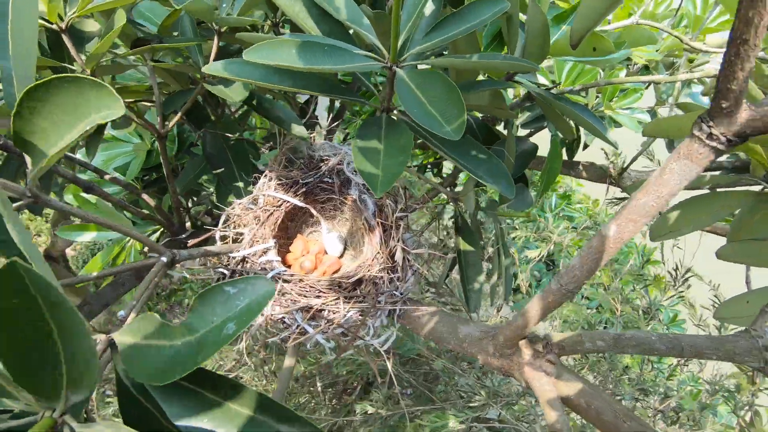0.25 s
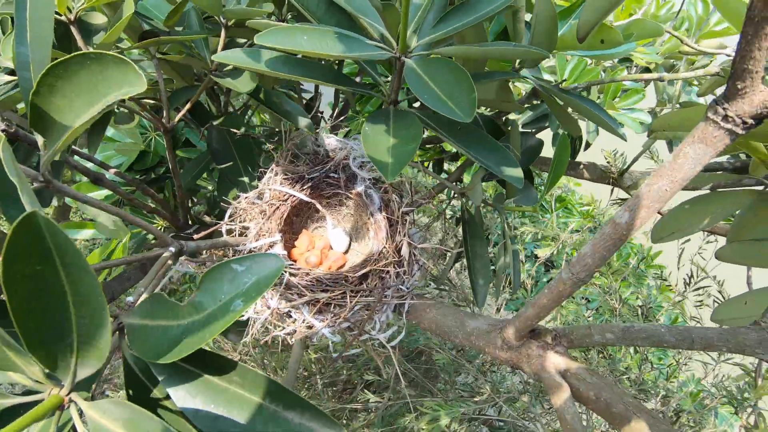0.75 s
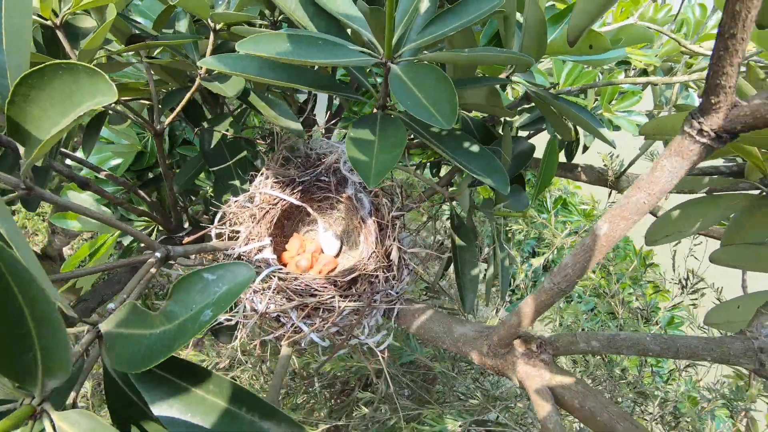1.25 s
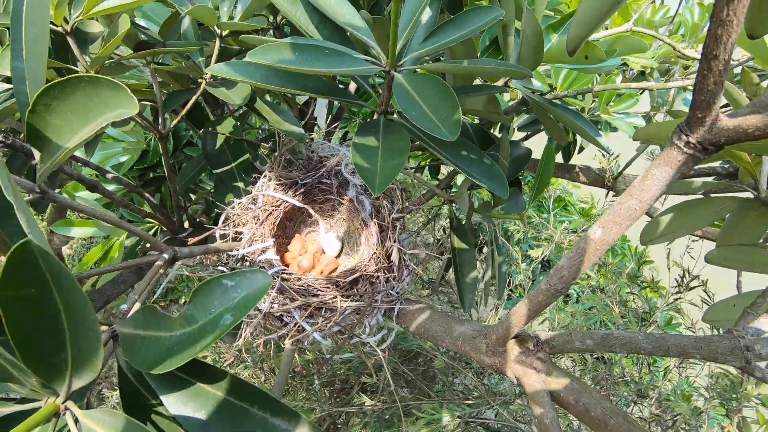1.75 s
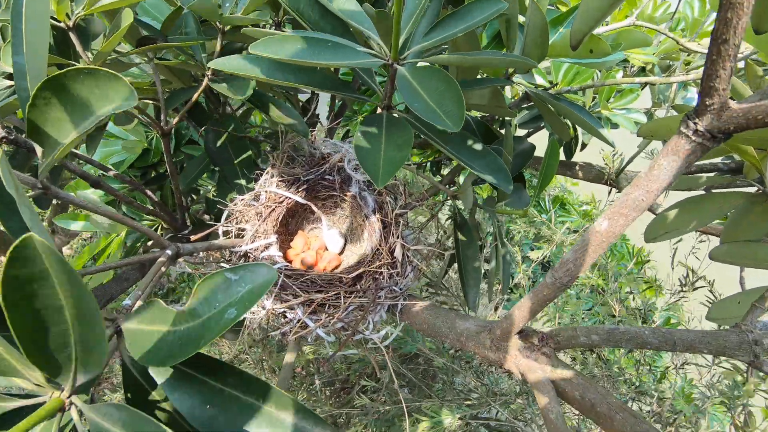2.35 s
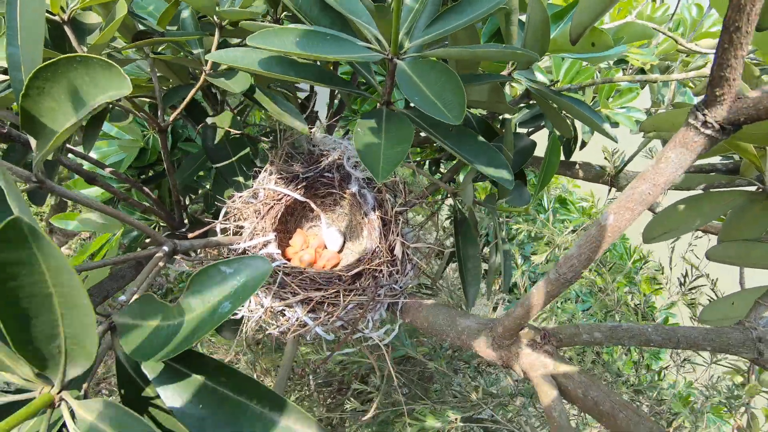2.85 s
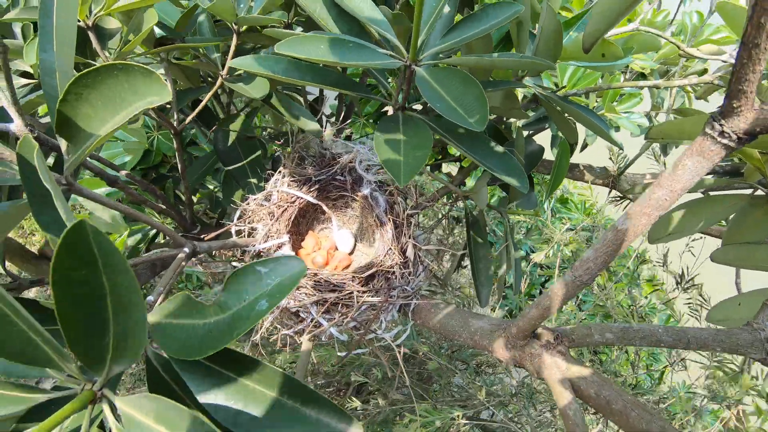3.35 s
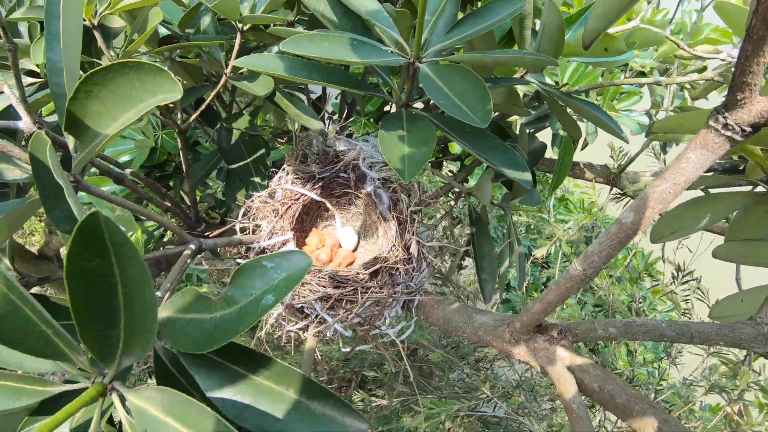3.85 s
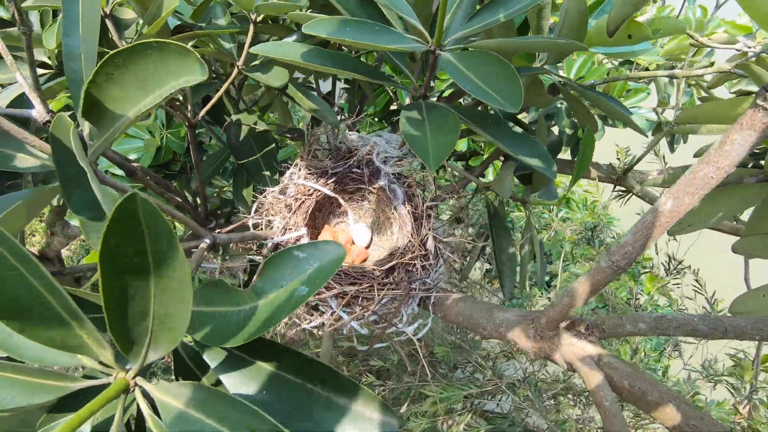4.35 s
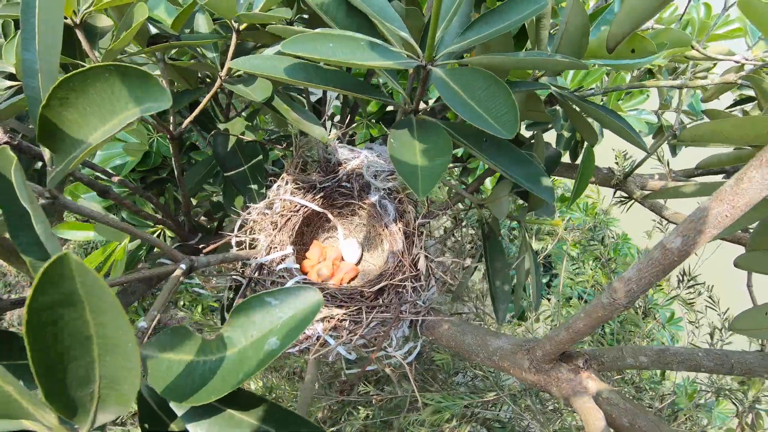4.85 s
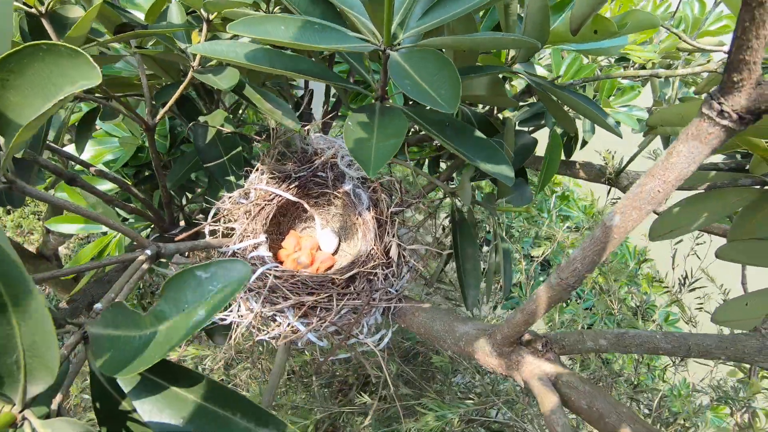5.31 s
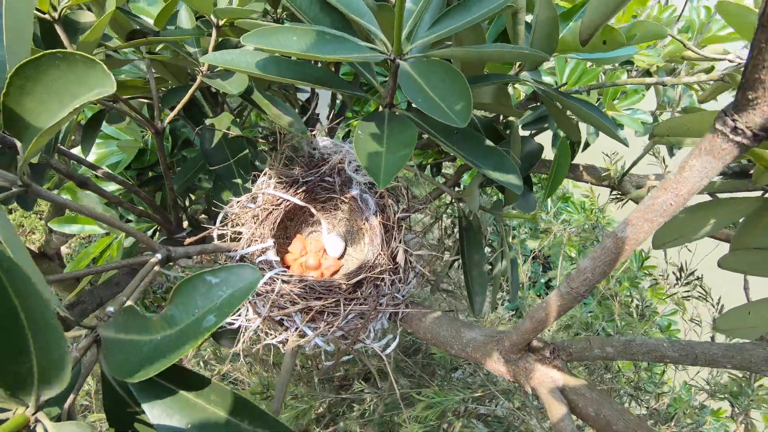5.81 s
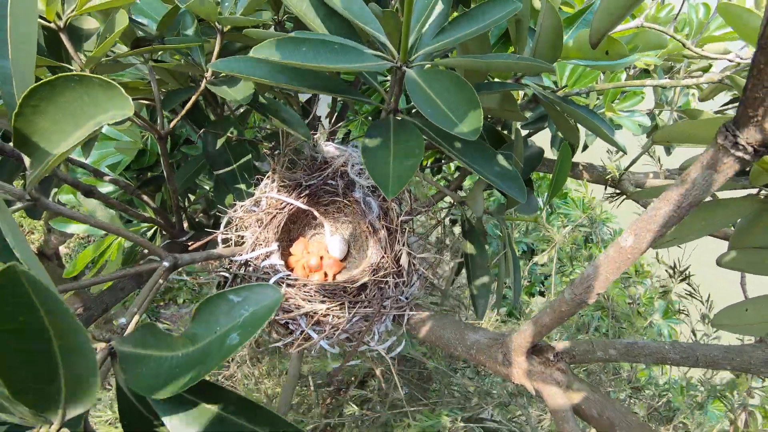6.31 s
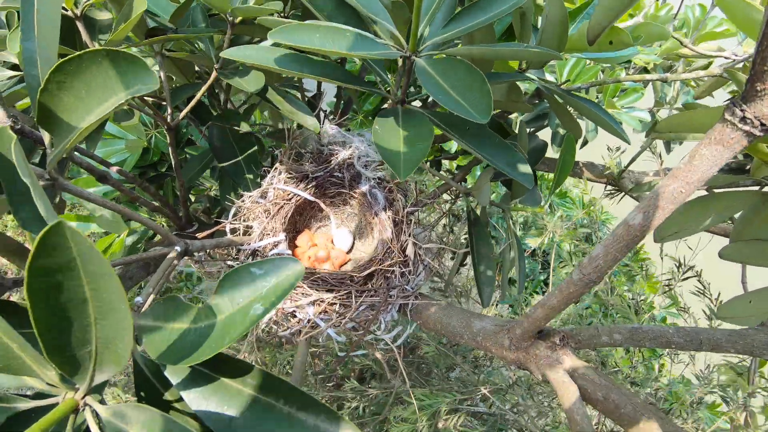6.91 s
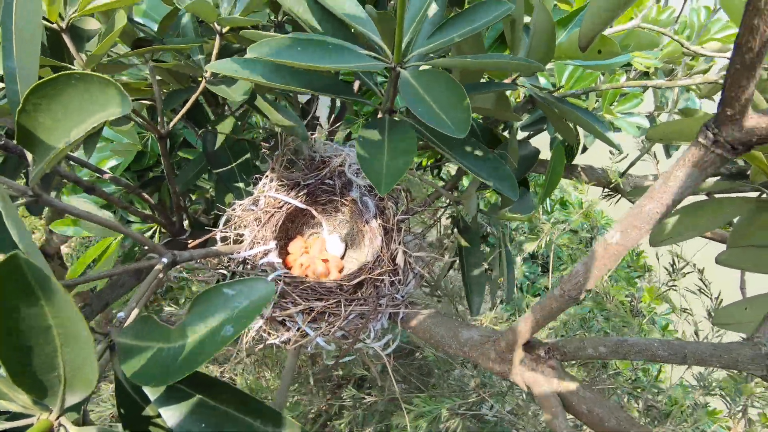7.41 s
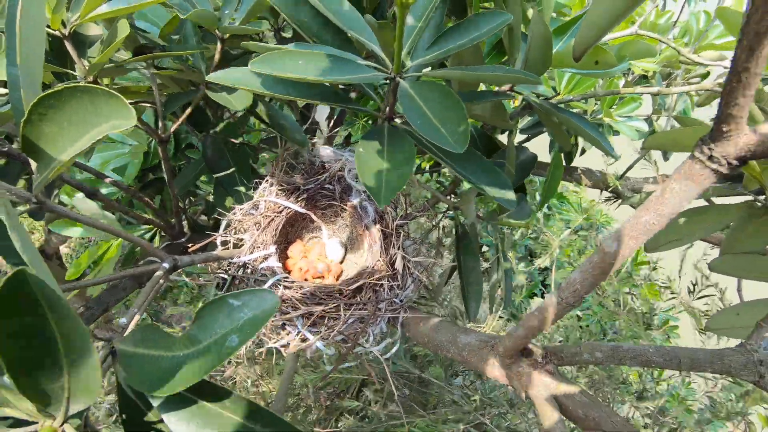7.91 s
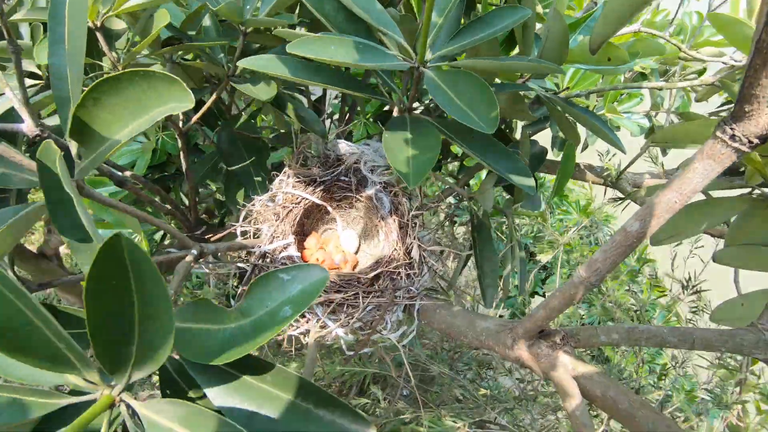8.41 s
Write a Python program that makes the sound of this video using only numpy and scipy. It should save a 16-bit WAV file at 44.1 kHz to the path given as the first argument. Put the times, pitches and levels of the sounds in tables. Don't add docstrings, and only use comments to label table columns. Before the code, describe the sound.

A hard double knock on a hollow pole, seconds of hollow scraping and rumbling jolts, a mid-way rattle of taps, then violent scrabbling strikes.

```python
import sys
import numpy as np
from scipy import signal
from scipy.fft import rfft, irfft
from scipy.io import wavfile

SR = 44100
rng = np.random.default_rng(int(sys.argv[2]) if len(sys.argv) > 2 else 0)


def rack_gain(trim_db):
    fader = np.asarray(trim_db, float)
    return 10 ** (fader / 20)


def inscribe(sig):
    pcm = np.round(np.clip(np.atleast_2d(sig).T, -1, 1) * 32767)
    wavfile.write(sys.argv[1], SR, pcm.astype(np.int16))


N = 382285
WHITE_DB = 10 * np.log10(2 / SR)

RUB_EDGES_HZ = [280, 950, 3500]
USUAL_RUB_DB = [-23, -40, -40, -55.5]
# (frequency [Hz], width [Hz], left [dB per Hz], right [dB per Hz], right lead [rad])
POLE_MODES = [(45, 30, -71, -63, .2), (67, 22, -59, -49, 1.0), (86, 28, -61, -50, .6),
              (133, 22, -59, -47, .5), (148, 16, -64, -47, 2.4), (165, 18, -56, -45, 3.1),
              (235, 60, -76, -68, 3.1), (340, 100, -77, -69, 3.0), (433, 25, -72, -60.5, -2.9),
              (490, 50, -75, -68.5, -2.9), (612, 44, -77, -67.5, -2.9), (695, 38, -69, -64, -2.7),
              (765, 60, -76, -74, -2.8)]
# (frequency [Hz], width [Hz], left [dB per Hz], right [dB per Hz], right lead [rad])
FRAME_MODES = [(960, 110, -78, -81, -2.2), (1076, 65, -66, -66, -2.65), (1210, 140, -75, -75, -2.8),
               (1400, 75, -73.5, -71.5, -2.6), (1620, 120, -84, -83, -1.0), (1770, 120, -88, -86, -.8),
               (2190, 135, -73, -73.5, -1.7), (2300, 120, -78, -79, -1.9), (2580, 150, -82, -77.5, -1.4),
               (2770, 120, -84, -84, -1.0), (2980, 200, -93, -93, -.6), (3290, 150, -86.5, -84, -.6),
               (3660, 150, -90, -90, -1.2)]
# (frequency [Hz], width [Hz], left [dB per Hz], right [dB per Hz], right lead [rad])
SHELL_MODES = [(4030, 200, -85.5, -84.5, -.4), (4720, 320, -94, -86, -.6), (5080, 120, -87, -88, 0.1),
               (5385, 180, -88, -87, -.7), (5980, 450, -98, -95, .4), (6900, 150, -104, -100, .5),
               (7780, 240, -90, -114, 2.5), (8700, 250, -98, -114, -3.0)]
BODY_MODES = POLE_MODES + FRAME_MODES + SHELL_MODES
# (time [s], peak [dB])
JOLTS = [(0.487, -20), (0.85, -42.5), (1.561, -13.5), (1.597, -10), (1.967, -34), (2.305, -18.5),
         (2.449, -49), (2.853, -4.5), (3.83, -18.5), (4.056, -8.5), (4.495, -10), (4.913, -14),
         (5.043, -7.5), (5.592, -13), (6.214, -12), (6.689, -29), (6.738, -30), (7.875, -6.5), (7.892, -24),
         (8.024, -2.5)]
# (time [s], length [s], level [dB], centre [Hz], pan [dB])
BRUSHES = [(.0, 0.005, -42, 4890, 2.5), (0.011, 0.0078, -39, 4000, 3), (1.458, 0.011, -61, 6030, -15),
           (2.036, 0.02, -63, 2400, -4), (4.985, 0.018, -44, 4000, 0), (4.98, .012, -50, 2800, 0),
           (7.931, 0.009, -50, 2500, 3), (7.933, .008, -54, 6500, 5), (7.87, .005, -54, 6500, 8),
           (7.879, .006, -40, 6500, 8), (7.997, 0.006, -37, 8500, 8), (7.995, .019, -40, 4000, 0),
           (8.001, 0.037, -55, 5870, 11), (7.982, .007, -48, 7000, 5), (8.009, .009, -44, 9000, 8),
           (8.045, .01, -56, 5500, 3), (8.095, .008, -60, 6000, 4), (.046, .005, -62, 7000, 5),
           (.004, .004, -42, 8500, 5), (1.45, .016, -62, 6050, -12)]
# (frequency [Hz], level [dB per Hz])
RUSTLE_SPECTRUM = [(30, -81.5), (200, -78), (500, -87), (900, -84), (1900, -101), (4500, -104),
                   (7000, -107), (10000, -110), (12000, -119), (13000, -145)]
# (frequency [Hz], level [dB per Hz])
AIR_SPECTRUM = [(30, -88), (120, -86), (400, -98), (1000, -108), (2000, -116), (3300, -123), (3700, -115),
                (5000, -114), (5400, -124), (9000, -135), (13000, -160)]
# (time [s], right peak [dB], frequency [Hz], t60 [s], left - right
# [dB])
RINGS = [(8.022, -12.5, 130.4, 0.31, -11.5), (0.0005, -15.5, 42.4, .06, -2),
         (0.012, -2.5, 110.2, .05, -5.5), (0.017, -5.5, 120.2, 0.07, -1), (0.0545, -1, 95, 0.03, -6),
         (0.054, -16.5, 65.8, 0.99, -24), (0.06, -41.5, 1380, 0.12, 11.5),
         (0.209, -49.5, 1080, 0.8, 0.5), (0.0128, -12, 399.5, .03, -9), (.055, -8.5, 1394, 0.02, 6),
         (.056, -11, 400, .04, -3), (5.009, -18, 1110, .035, -3), (5.047, -19.5, 691.4, 0.27, -5),
         (5.047, -19, 433, .15, -9), (5.09, -29, 1070, .12, 0), (5.118, -29, 1080, .1, 1),
         (5.127, -25, 704, .15, -3), (5.15, -34, 1076, .2, 1), (5.245, -31, 434.3, 0.28, -10),
         (5.4, -38, 1390, 0.21, 0), (6.715, -25.5, 250, .07, -14), (6.735, -35.5, 1080, .1, 1),
         (6.812, -39, 1078, .3, 1.5), (7.8924, -2, 2620, .013, -1), (7.892, -12.5, 1300, .015, 5),
         (.0114, -7, 1300, .016, 5), (5.046, -25, 2240, 0.046, -1.5), (5.046, -23, 1690, .015, 0),
         (7.9733, -15, 3410, 0.018, 4.5), (7.9733, -21, 6500, .015, 0),
         (8.0015, -20.5, 6150, .015, 4), (0.845, -33, 234, 0.19, -24), (3.832, -24, 215.8, 0.09, -24),
         (6.688, -22, 254.8, 0.087, -15), (7.974, -19.5, 1400, 0.0596, -5),
         (8.003, -5.5, 85.4, 0.014, 11), (8.022, -33.5, 1018, .1, 8.5), (8.281, -36, 1065, 0.12, 3.5),
         (8.296, -29.5, 436, 0.2, -12), (1.976, -29.5, 305.4, 0.037, -14),
         (8.364, -42, 432, 0.15, -10),
         (7.881, -22, 530, .03, 0), (8.022, -20, 260, .06, -10), (8.08, -33, 606, .06, -6),
               (1.3326, -38, 610, .06, -6), (5.011, -24, 1450, .03, -3), (8.279, -34, 520, .05, -5),
               (.0114, -10, 2620, .018, 0), (.0166, -11, 2450, .016, 0), (.0114, -9, 3900, .012, 0),
               (.0555, -14, 650, .02, 0), (7.8924, -14, 1650, .014, 0), (7.8924, -17, 4300, .01, 2),
               (5.046, -29, 3600, .012, 0), (.471, -36, 1080, .05, 0), (.471, -36, 600, .05, -6),
               (1.562, -32, 400, .04, -4), (7.998, -20, 380, .03, -4), (8.025, -24, 432, .15, -10),
               (6.82, -35, 400, .06, -6)]
# (start [s], crest [s], end [s], housing level [dB], shaft - housing [dB])
STROKES = [(0.181, 0.242, 0.31, -53, -13), (0.292, .374, .44, -50.5, 3.5), (0.42, 0.462, 0.66, -51, -2.5),
           (0.83, 0.875, 1.42, -53.5, -7), (.80, 1.28, 1.42, -47, 8), (1.475, 1.67, 1.96, -38, -4),
           (2.015, 2.045, 2.08, -57, 4), (2.25, 2.45, 2.62, -39.5, 0.5), (2.701, 3.02, 3.25, -38.5, 0),
           (3.201, 3.427, 3.65, -45, 3), (3.938, 4.06, 4.35, -46, 4.5), (4.2, 4.33, 4.42, -47, 3.5),
           (4.409, 4.483, 4.713, -38, 3), (4.626, 4.775, 4.96, -40, -7.5), (4.817, 5.02, 5.18, -35.5, 1),
           (4.99, 5.359, 5.455, -36, -4.5), (5.052, 5.103, 5.33, -45.5, 11), (5.585, 5.64, 5.9, -46, 7.5),
           (5.66, 5.987, 6.16, -40, -1), (6.04, 6.45, 6.69, -39, -1), (6.728, 6.731, 6.79, -40.5, 6.5),
           (6.77, 6.839, 6.95, -45, 8), (6.8, 7.25, 7.5, -43.5, 0.5), (7.413, 7.695, 7.92, -41, 4),
           (3.689, 3.925, 4.02, -54, 7)]
# (start [s], crest [s], end [s], housing level [dB], shaft - housing [dB])
SCRABBLES = [
    (-.01, -0.001, 0.011, -34.5, 22.5),
    (0.016, 0.057, .11, -47, -5.5),
    (7.84, 7.886, 7.899, -35, -16),
    (7.93, 7.984, 8.07, -35, -6),
    (8.022, 8.054, 8.17, -49, 16),
    (8.098, 8.263, 8.39, -50, 7),
]
# (time [s], level [dB])
GRIP = [(0, -60.5), (.72, -68), (1.5, -61), (2.15, -62.5), (4.2, -60.5), (5.52, -57), (5.9, -51.5),
        (7.8, -57.5), (8.4, -70), (8.46, -83), (8.59, -83), (8.67, -85.5)]
# (start [s], crest [s], end [s], level [dB])
LURCHES = [(0, .1, 0.34, -23.5), (.45, .514, 0.55, -26), (.72, .893, 0.94, -25.5),
           (.97, 1.018, 1.065, -24.5), (1.15, 1.25, 1.55, -29.5), (1.48, 1.67, 1.84, -17),
           (1.8, 1.89, 2.12, -27.5), (2.32, 2.474, 2.75, -22), (2.76, 2.878, 3.12, -19.5),
           (3.02, 3.2, 3.33, -25.5), (3.3, 3.54, 3.65, -30), (3.69, 3.746, 3.81, -39),
           (3.816, 3.846, 3.96, -27.5), (3.97, 4.081, 4.19, -21.5), (4.2, 4.6, 4.7, -21.5),
           (4.62, 4.75, 4.92, -27.5), (4.894, 4.929, 4.98, -23.5), (4.96, 5.115, 5.155, -15),
           (5.16, 5.253, 5.29, -19.5), (5.27, 5.363, 5.41, -19.5), (5.53, 5.672, 5.86, -24),
           (5.83, 5.99, 6.2, -28.5), (6.13, 6.42, 6.75, -20.5), (6.67, 6.74, 6.83, -13.5),
           (6.86, 6.914, 7.1, -30), (7.0, 7.3, 7.6, -30), (7.55, 7.613, 7.73, -23.5),
           (7.75, 7.807, 7.86, -21), (7.85, 7.892, 8.07, -16.5), (7.96, 8.042, 8.19, -17.5)]
# (time [s], crack peak [dB], crack ring [Hz], housing level [dB], shaft level [dB])
STRIKES = [(0.011, -12, 6000, -9, -17), (0.0163, -16, 4500, -19, -30), (0.055, -16, 7900, -15, -31.5),
           (7.8693, -39.5, 2514, -31.5, -31.5), (7.8805, -27, 6500, -22, -20),
           (7.8920, -15, 5600, -11, -16), (7.9346, -36, 2315, -27.5, -40), (7.9733, -20, 5300, -23, -40),
           (8.001, -20, 7000, -16, -19.5), (8.0156, -34, 2600, -29, -27), (8.0241, -36, 2160, -25.5, -17.5)]
# (time [s], crack peak [dB], crack ring [Hz], housing level
# [dB], shaft level [dB])
TAPS = [(0.4711, -40.5, 5000, -27, -30.5), (1.3326, -46, 2090, -28, -27), (1.5621, -47, 2200, -25.5, -26.5),
        (5.009, -27, 5400, -23, -20), (5.0455, -30, 4100, -13, -11.5), (5.0590, -48, 2250, -20, -18.5),
        (5.0720, -52, 2250, -25, -25), (5.1390, -52, 2200, -26, -23), (5.2120, -56, 2200, -29, -26),
        (5.2330, -56, 2200, -29, -27), (5.3170, -56, 2200, -33, -27.5), (5.3550, -50, 2190, -28, -37),
        (5.0886, -50, 2200, -20, -18.5), (5.099, -42, 5500, -20.5, -25), (5.1176, -50, 2200, -30, -27),
        (5.1266, -42, 2200, -19, -20), (1.234, -52, 5400, -36, -40), (2.239, -58, 3900, -48, -50),
        (3.035, -56, 2300, -32, -20), (3.85, -58, 5500, -50, -50), (4.0389, -50, 5000, -38, -45),
        (4.064, -55, 6500, -44, -30), (6.7078, -50, 4060, -40, -45), (6.764, -52, 5000, -42, -45),
        (6.7326, -42.5, 2060, -32, -38), (8.0806, -48, 2150, -27, -22), (8.1826, -45, 2640, -35, -53),
        (8.2366, -44.5, 4771, -50, -43), (8.3776, -55, 2750, -53, -50)]
# (frequency [Hz], level [dB per Hz])
WIND_SPECTRUM = [(25, -77.5), (70, -67.5), (150, -69), (300, -88.5), (1000, -130)]
# (start [s], end [s], extra hiss [dB])
DRY_LEAVES = [
    (4.45, 5.427, 2),
    (4.69, 5.008, 3.5),
    (5.94, 6.04, 3.5),
    (8.072, 8.28, 6),
]
# (frequency [Hz], level [dB per Hz])
CRACKLE_SPECTRUM = [(4000, -125), (7000, -102), (9000, -98), (11000, -110), (12500, -140)]
# (start [s], end [s])
REGRIP_S = (3.34, 4.05)
# (frequency [Hz], level [dB])
BEFORE_REGRIP = [(612, -2), (695, -3), (960, -5), (1076, -2.5), (1210, 0), (1400, 2), (1620, 3), (1770, 0),
                 (2190, -5), (2300, 4), (2580, 3.5), (2770, 1.5), (5980, -1), (7780, -5), (8700, -4)]
# (start [s], end [s], start [Hz], end [Hz], level [dB], pan [dB])
PEEP = (.505, .615, 3470, 3560, -68, 4)
# (frequency [Hz], level [dB per Hz])
BREEZE_SPECTRUM = [(900, -112), (1700, -105), (3200, -110), (5000, -118), (7000, -118), (10000, -118),
                   (12000, -121), (13000, -140)]
# (frequency [Hz], level [dB per Hz])
INSECT_SPECTRUM = [(5300, -135), (5750, -111), (6300, -110), (6700, -135)]
# (time [s], peak [dB], start [Hz], end [Hz], length [s])
SLIDES = [
    (5.008, -27, 850, 1550, .009),
    (8.002, -31, 2100, 1000, .025),
]

STROKE_EDGE_DB, STROKE_ROUNDNESS, STROKE_STOP = 21, 1.79, 2.8
LURCH_EDGE_DB, LURCH_ROUNDNESS = 15.5, 1.18
SWAY_REST_DB, SHAFT_REST_DB, HOUSING_REST_DB, HISS_REST_DB = 22.5, 6, -6, -19
HISS_BELOW_DB, HISS_FOLLOWS = -16.5, 0.94
STRIKE_PAN_DB, STRIKE_CONTACT_S = 0.5, .0004
TAP_PAN_DB, TAP_CONTACT_S = -1, 0.00047
SHADE_HZ, SHADE_DB = 6800, -16
TOP_MODES_HZ, TOP_NEEDS_FORCE = 7000, .6


def drift(rate_hz):
    r = np.exp(-80 * np.pi * rate_hz / SR)
    white = rng.standard_normal(N // 40 + 2002)
    slow = signal.lfilter([1], [1, -2 * r, r * r], white)[2000:]
    return np.interp(np.arange(N) / 40, np.arange(len(slow)), slow / slow.std())


def coloured(spectrum, channels):
    hz, db = np.transpose(spectrum)
    log_hz = np.log(np.fft.rfftfreq(N, 1 / SR) + 1)
    gain = rack_gain(np.interp(log_hz, np.log(hz), db) - WHITE_DB)
    return irfft(rfft(rng.standard_normal((channels, N))) * gain, N)


def between(start_s, end_s, edge_s):
    t = np.arange(N) / SR
    return np.clip(np.minimum(t - start_s, end_s - t) / edge_s + .5, 0, 1)


def add_blows(force, times_s, sizes, contact_s):
    for s, size, lasts_s in zip(times_s, sizes, contact_s + 0 * times_s):
        press = np.hanning(int(lasts_s * SR) + 3)
        force[int(s * SR):][:len(press)] += size * press / press.sum()


def all_blows():
    blows = []
    for rows, pan_db, contact_s in ((STRIKES, STRIKE_PAN_DB, STRIKE_CONTACT_S),
                                    (TAPS, TAP_PAN_DB, TAP_CONTACT_S)):
        for s, crack_db, hz, housing_db, shaft_db in rows:
            blows.append((s, crack_db, hz, pan_db, housing_db, shaft_db, contact_s))
    return sorted(blows)


def swells_db(rows, rest_db, edge_db, rise_roundness, fall_roundness):
    t = np.arange(0, N, 64) / SR
    power = rack_gain(2 * rest_db[::64])
    for start, crest, end, level_db in rows:
        rise = np.clip((crest - t) / (crest - start), 0, 9)
        fall = np.clip((t - crest) / (end - crest), 0, 9)
        drop_db = edge_db * (rise ** rise_roundness + fall ** fall_roundness)
        power = power + rack_gain(2 * (level_db - drop_db))
    return np.interp(np.arange(N) / SR, t, 10 * np.log10(power))


def dry_leaves_db():
    return sum(level_db * between(start, end, edge_s=.03) for start, end, level_db in DRY_LEAVES)


def rub_gains_db():
    grip_db = np.interp(np.arange(N) / SR, *np.transpose(GRIP))
    rubs = np.array(STROKES + SCRABBLES)
    times, housing_db, shaft_db = rubs[:, :3], rubs[:, 3], rubs[:, 3] + rubs[:, 4]
    usual_db = USUAL_RUB_DB[2]
    hiss_db = usual_db + HISS_FOLLOWS * (housing_db - usual_db) + HISS_BELOW_DB

    def strokes_db(level_db, rest_db):
        rows = np.column_stack([times, level_db])
        return swells_db(rows, grip_db + rest_db, STROKE_EDGE_DB, STROKE_ROUNDNESS, STROKE_STOP)

    brief_drop_db = -20 * between(7.898, 7.97, edge_s=.006)
    sway = swells_db(LURCHES, grip_db + SWAY_REST_DB, LURCH_EDGE_DB, LURCH_ROUNDNESS, LURCH_ROUNDNESS)
    shaft = strokes_db(shaft_db, SHAFT_REST_DB) + brief_drop_db
    housing = strokes_db(housing_db, HOUSING_REST_DB) + brief_drop_db
    hiss = strokes_db(hiss_db, HISS_REST_DB) + brief_drop_db + dry_leaves_db()
    return [db - usual for db, usual in zip((sway, shaft, housing, hiss), USUAL_RUB_DB)]


def pole(rub_db):
    lumps_db, grain_db, wander_db, scatter_db = [2.48, 2.5, 1.6, 0.75], 1.43, 2.2, 3
    out, white = np.zeros((2, N)), rng.standard_normal((3, N))
    times_s, _, _, _, housing_db, shaft_db, contact_s = np.transpose(all_blows())
    jolt_s, jolt_db = np.transpose(JOLTS)
    grain = grain_db * drift(86.0)
    strength = []
    for part, (db, lump_db) in enumerate(zip(rub_db, lumps_db)):
        strength.append(rack_gain(db + lump_db * drift(19.0) + grain * (part > 0)))
    wander = [rack_gain(wander_db * drift(2.7)) for _ in range(5)]
    chance = rng.standard_normal((len(times_s), len(BODY_MODES), 2))
    struck = rack_gain(scatter_db * chance[..., 0]) * np.sign(chance[..., 1])
    firm = rack_gain(TOP_NEEDS_FORCE * np.minimum(rub_db[3], 0))
    before = np.interp(np.arange(N) / SR, REGRIP_S, [1, 0])
    regrip_db = dict(BEFORE_REGRIP)
    for k, (hz, width_hz, left_db, right_db, lead) in enumerate(BODY_MODES):
        part = np.searchsorted(RUB_EDGES_HZ, hz)
        force = white[k % 3] * strength[part] * wander[k % 5] * rack_gain(before * regrip_db.get(hz, 0))
        if hz > TOP_MODES_HZ:
            force = force * firm
        if part == 0:
            add_blows(force, jolt_s, -rack_gain(jolt_db + 46.5), contact_s=0.0035)
        else:
            blow_db = shaft_db + 64 if part == 1 else housing_db + 62
            add_blows(force, times_s, rack_gain(blow_db) * struck[:, k], contact_s)
        turn = np.exp((-np.pi * 3 / 2 * width_hz + 2j * np.pi * hz) / SR)
        motion = signal.lfilter([2 * (1 - abs(turn)) ** 2], [1, -2 * turn, turn ** 2], force)
        turned = np.cos(lead) * motion.real - np.sin(lead) * motion.imag
        out[0] += rack_gain(left_db - WHITE_DB) * motion.real
        out[1] += rack_gain(right_db - WHITE_DB) * turned
    return out


def wind(sway_db):
    return coloured(WIND_SPECTRUM, channels=2) * rack_gain(sway_db) * rack_gain([[-6], [0]])


def rustle(hiss_db):
    return coloured(RUSTLE_SPECTRUM, channels=2) * rack_gain(hiss_db) * rack_gain([[-3], [-1]])


def air():
    shared, left, right = coloured(AIR_SPECTRUM, channels=3)
    return rack_gain(2.5) * (.8 * shared + .6 * np.array([left, right]))


def burst(start_s, envelope, centre_hz, sharpness, peaked_db, pan_db, alike, top_hz=8500):
    white = rng.standard_normal((3, 4096))[:, :len(envelope)] * envelope
    white = np.sqrt(alike) * white[0] + np.sqrt(1 - alike) * white[1:]
    ringing = signal.lfilter(*signal.iirpeak(centre_hz, sharpness, SR), white)
    wide = signal.sosfilt(signal.butter(3, [1200, top_hz], "band", fs=SR, output="sos"), white)
    sound = (wide + rack_gain(peaked_db) * ringing) * rack_gain(np.array([[pan_db / 2], [-pan_db / 2]]))
    dull = signal.sosfilt(signal.butter(4, SHADE_HZ, fs=SR, output="sos"), sound[1])
    bright = signal.sosfilt(signal.butter(4, SHADE_HZ, "high", fs=SR, output="sos"), sound[1])
    sound[1] = dull + rack_gain(SHADE_DB) * bright
    first = int(start_s * SR)
    return slice(first, first + len(envelope)), sound / np.abs(sound.mean(axis=0)).max()


def brushes():
    out = np.zeros((2, N))
    for s, length_s, level_db, hz, pan_db in BRUSHES:
        envelope = np.hanning(min(int(2 * length_s * SR), 4096))
        where, sound = burst(s, envelope, hz, sharpness=3.4, peaked_db=-1.5, pan_db=pan_db,
                             alike=0.45, top_hz=max(8500, 1.6 * hz))
        top_hz = min(2.4 * hz, 1.3 * hz + 2500)
        sound = signal.sosfilt(signal.butter(6, top_hz, fs=SR, output="sos"), sound)
        out[:, where] += rack_gain(level_db + 8) * sound
    return out


def rings():
    out, waver = np.zeros((2, N)), rack_gain(2 * drift(70))
    for s, level_db, hz, t60_s, left_db in RINGS:
        nearest = min(BODY_MODES, key=lambda mode: abs(mode[0] - hz))
        lead = nearest[4] if hz < 2000 else 0
        first, t = int(s * SR), np.arange(int(min(t60_s, .3) * SR)) / SR
        envelope = (1 - np.exp(-t / .0005)) * rack_gain(level_db - 60 * t / t60_s)
        envelope = envelope * np.cos(np.pi / 2 * t / t[-1])
        if hz > 300:
            envelope = envelope * waver[first:][:len(t)]
        tone = np.sin(2 * np.pi * hz * t + np.pi + np.array([[-lead], [0]]))
        out[:, first:first + len(t)] += envelope * tone * rack_gain(np.array([[left_db], [0]]))
    return out


def cracks():
    out, t = np.zeros((2, N)), np.arange(2048) / SR
    decay = np.exp(-t / .0012) + .07 * np.exp(-t / .002)
    envelope = (1 - np.exp(-t / .0008)) ** 2 * decay
    for s, level_db, hz, pan_db, *_ in all_blows():
        where, sound = burst(s, envelope, hz, sharpness=6.0, peaked_db=19, pan_db=pan_db, alike=.4)
        if level_db < -25:
            sound = signal.sosfilt(signal.butter(7, 9000, fs=SR, output="sos"), sound)
        out[:, where] += rack_gain(level_db) * sound
    return out


def thuds():
    out, t = np.zeros((2, N)), np.arange(2048) / SR
    band = signal.butter(2, (362, 1800), "band", fs=SR, output="sos")
    for s, _, _, housing_db, _ in STRIKES:
        puff = signal.sosfilt(band, rng.standard_normal(len(t)) * np.exp(-t / 0.0038))
        puff = rack_gain(housing_db - 3) * puff / np.abs(puff).max()
        first = int(s * SR)
        out[:, first:first + len(t)] += puff * np.array([[1], [.5]])
    return out


def peep():
    start_s, end_s, start_hz, end_hz, level_db, pan_db = PEEP
    hz = np.interp(np.arange(N) / SR, [start_s, end_s], [start_hz, end_hz]) + 80 * drift(60.0)
    tone = np.sin(2 * np.pi * np.cumsum(hz) / SR) * between(start_s, end_s, edge_s=.02)
    return tone * rack_gain(level_db + 4.0 * drift(40.0)) * rack_gain([[pan_db / 2], [-pan_db / 2]])


def breeze():
    leaves = coloured(BREEZE_SPECTRUM, channels=2)
    insects = coloured(INSECT_SPECTRUM, channels=1) * rack_gain([[-14], [0]]) * rack_gain(2.5 * drift(3.0))
    return (leaves + insects) * between(1.1, 8.25, edge_s=.4)


def leaf_crackle(hiss_db):
    present = 1 - rack_gain(-2 * dry_leaves_db())
    uneven = rack_gain(hiss_db + 4.5 * drift(25.0))
    return coloured(CRACKLE_SPECTRUM, channels=2) * uneven * present * rack_gain([[0], [-10]])


def slides():
    out = np.zeros((2, N))
    for s, level_db, start_hz, end_hz, length_s in SLIDES:
        hz = np.geomspace(start_hz, end_hz, int(length_s * SR))
        tone = np.sin(2 * np.pi * np.cumsum(hz) / SR) * np.hanning(len(hz)) * rack_gain(level_db)
        first = int(s * SR)
        out[:, first:first + len(hz)] += tone * np.array([[.4], [1.6]])
    return out


def scene():
    rub_db = rub_gains_db()
    sway_db, hiss_db = rub_db[0], rub_db[3]
    rubbing = pole(rub_db) + rustle(hiss_db) + brushes() + leaf_crackle(hiss_db)
    blows = rings() + cracks() + thuds() + slides()
    outdoors = wind(sway_db) + air() + breeze() + peep()
    return rubbing + blows + outdoors


def top_cut(x):
    return signal.sosfilt(signal.butter(12, 15850, fs=SR, output="sos"), x)


def record(dry):
    dull = signal.sosfilt(signal.butter(2, [28, 11500], "band", fs=SR, output="sos"), dry)
    mix = np.clip(dull, -1, 1)
    return top_cut(mix)


dry = scene()
out = record(dry)
inscribe(out)
```